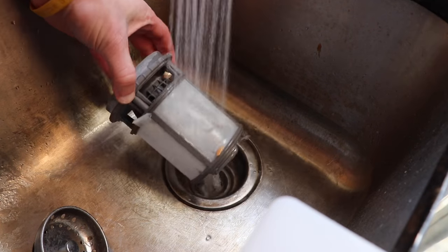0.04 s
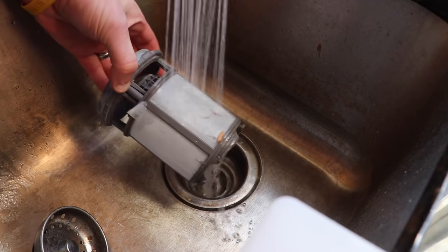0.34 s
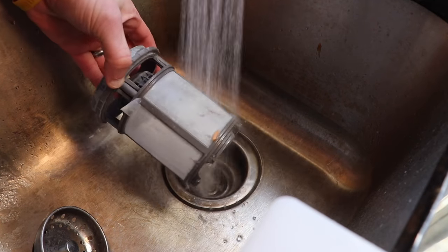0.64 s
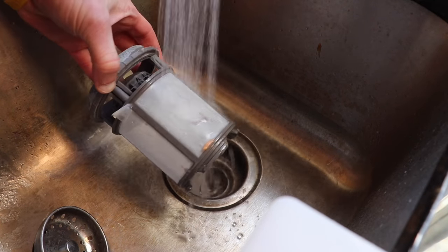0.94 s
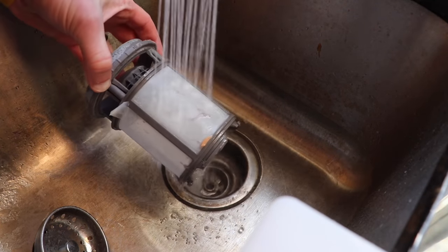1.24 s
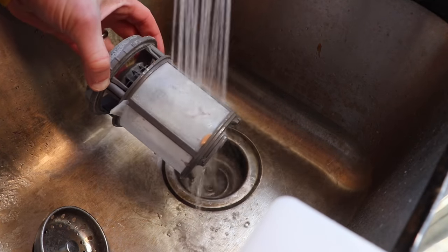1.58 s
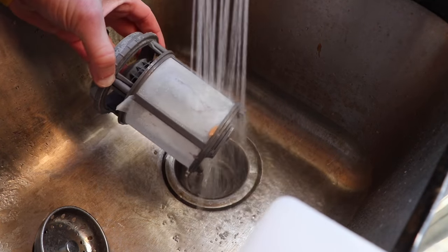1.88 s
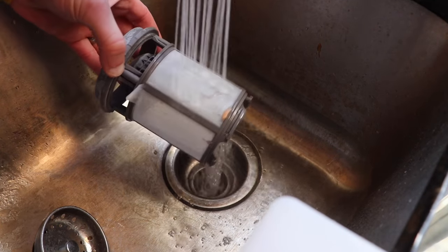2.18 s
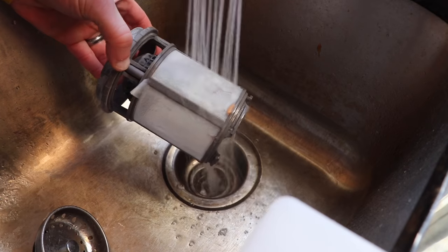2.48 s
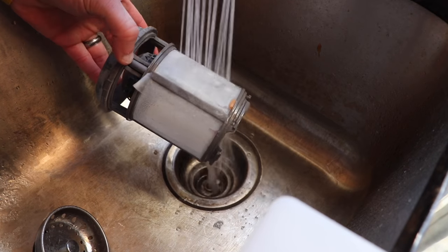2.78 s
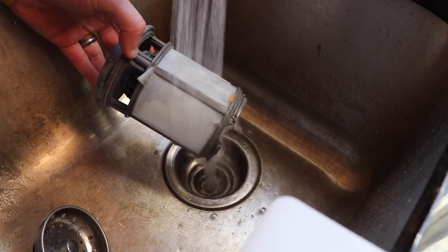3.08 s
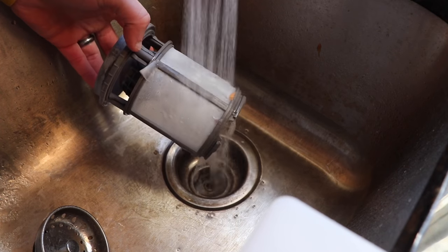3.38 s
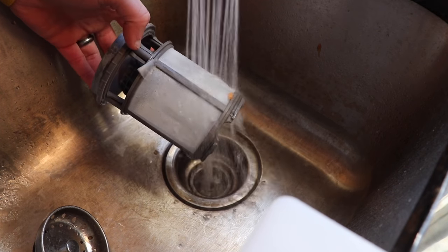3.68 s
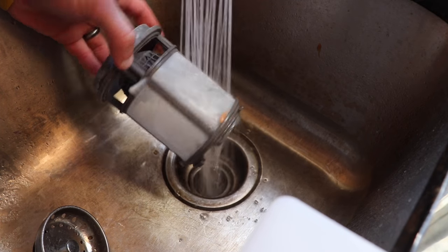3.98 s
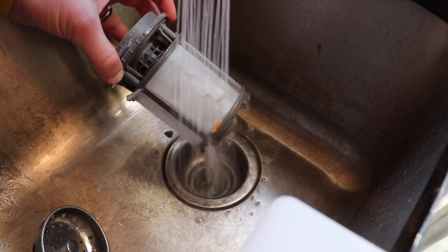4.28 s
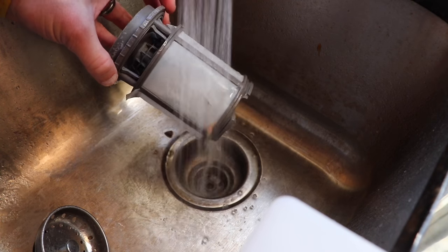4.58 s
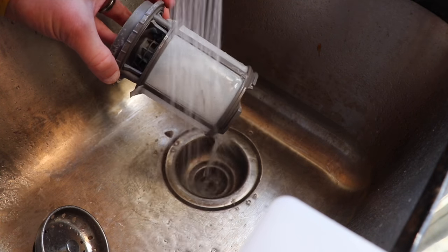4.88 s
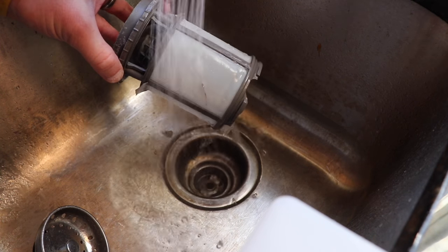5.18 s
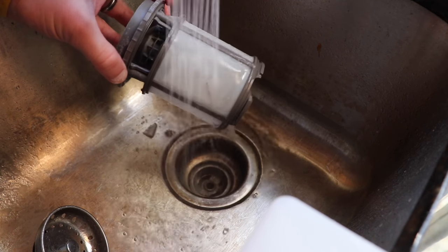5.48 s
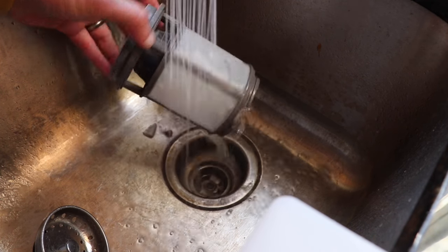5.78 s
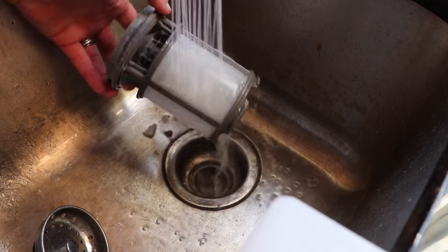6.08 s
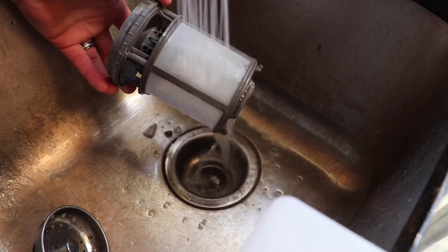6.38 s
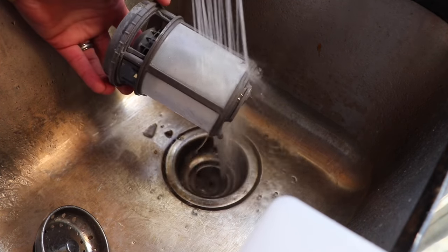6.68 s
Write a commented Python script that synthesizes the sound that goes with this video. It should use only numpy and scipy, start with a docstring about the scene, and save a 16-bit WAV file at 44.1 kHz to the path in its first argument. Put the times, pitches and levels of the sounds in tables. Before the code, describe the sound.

A close, continuous rush of water from a sprayer hits a mesh filter and a steel sink. The splash has a metallic ring that slowly changes colour, topped by a bright hiss and faint high ringing from the wet filter. Hollow drumming and a few soft thuds of runoff lie beneath. Later come sharp little drop ticks, a single bubble pop and a light ring from the drain, with the water still running.

```python
"""You hear a steady, ringing rush of water: a tap sprayer playing on a mesh filter over a steel sink.
Countless drops set the basin ringing, and its tone shifts as the filter moves the landing spot.
Fine spray hisses on the mesh, and the wet filter rings as the jet sweeps over it. Runoff drums on the
steel floor, stray drops tick, one bubble pops, and near the end the open drain rings.
A faint low rumble lies under the opening moments."""
import sys
import numpy as np
from scipy import signal
from scipy.fft import rfft, irfft, next_fast_len
from scipy.io import wavfile

SR = 44100
rng = np.random.default_rng(int(sys.argv[2]) if len(sys.argv) > 2 else 0)


def waveform_to_disk(signal):
    """Save audio, clipped to [-1, 1], as 16-bit WAV at the path in sys.argv[1]."""
    frames = np.transpose(np.atleast_2d(signal))
    scaled = np.clip(frames, -1, 1) * 32767
    samples = np.round(scaled).astype(np.int16)
    wavfile.write(sys.argv[1], SR, samples)


N = 297234
TIME = np.arange(N) / SR

# The basin's ringing notes. Each row: pitch in Hz, width in Hz, then strength in dB for each of the
# five landing spots, 0 to 4.
BASIN_NOTES = [(529, 56, -30, -30, -30, -17, -20), (609, 90, -17.5, -17.5, -21, -13, -16.5),
               (703, 87, -18, -17.5, -20, -18, -22), (769, 94, -16, -17, -17, -16, -16),
               (865, 90, -11, -13, -11.5, -16, -17), (930, 72, -9, -12, -9, -18, -20),
               (1069, 90, -12, -12.5, -13, -17, -24), (1121, 70, -15, -11.5, -9, -11, -7.5),
               (1204, 82, -30, -18.5, -13, -12.5, -9), (1310, 96, -9, -7, -18, -16, -28),
               (1422, 92, -8.5, -7.5, -13, -12, -11), (1487, 75, -14, -14, -18, -13, -14),
               (1588, 85, -9.5, -9.5, -11.5, -13, -14), (1649, 68, -14, -14, -16, -15, -23),
               (1782, 87, -12, -15, -18, -17, -17), (1872, 90, -17, -21, -16, -11, -17),
               (2016, 148, -14.5, -14, -13, -12.5, -14), (2167, 116, -16, -19, -13.5, -17, -13.5),
               (2372, 241, -20, -14.5, -16, -21, -25), (2731, 241, -18, -17, -19, -19, -17),
               (2947, 158, -19, -16, -14.5, -21, -20), (3048, 137, -16, -15, -14, -17, -14),
               (3229, 210, -16, -13, -15, -18, -19), (3469, 221, -20, -19, -20, -25, -22),
               (3759, 162, -26, -26, -20, -25, -23), (4089, 233, -22, -23, -17, -19, -18.5),
               (4578, 281, -26, -26, -21, -20, -16.5), (4754, 166, -24, -24, -20, -24, -24),
               (5428, 407, -22, -25, -23, -22.5, -21.5)]
# Where the water lands. Each row: time in seconds, spot number (outside 0 to 4, the nearest end counts).
LANDING_SPOT = [(0, -0.5), (0.45, 0.7), (1.3, 1), (1.7, 1), (1.9, 1.9), (2.3, 1.76), (2.8, 1.5), (3.15, 2),
                (3.6, 2), (4.15, 2), (4.4, 3), (4.7, 3.5), (5.3, 4), (6.1, 7), (6.74, 6)]
# Water that misses the filter and hits the steel directly. Each row: time in seconds, boost in dB.
DIRECT_JET = [(0, 1.5), (.65, -0.1), (1.1, -1.6), (1.65, -1.1), (1.9, -3), (2.1, 0), (2.75, -2),
              (3.25, 1.5), (3.5, -0.5), (3.65, -1.5), (4.05, 2.5), (4.35, 0), (5.4, 0.3), (5.8, 0.4),
              (6.74, -2.1)]
# Fine spray, louder when the jet meets the mesh squarely. Each row: time in seconds, level in dB.
SPRAY_LEVEL = [(0, -53.5), (0.4, -54.5), (0.98, -52.5), (1.22, -55), (1.7, -51.5), (2.02, -52),
               (2.15, -53.5), (2.47, -51), (2.65, -52.5), (3.0, -51.5), (3.65, -52.5), (3.9, -53),
               (4.3, -51), (4.65, -50.8), (5.0, -51), (5.27, -50), (5.9, -51), (6.2, -54), (6.74, -50)]
# Echoes off the basin walls. Each row: delay in seconds, strength in dB.
WALL_ECHOES = [(.0028, -22), (.0044, -18), (.00555, -17), (.0064, -21), (.008, -21)]
# The jet sweeping over the filter. Each row: middle in seconds, length in seconds, pitch at the middle
# in Hz, glide in Hz per second, width in Hz, level in dB.
FILTER_SWEEPS = [(0.932, 0.85, 3080, 4, 460, -53), (1.4, 0.43, 3190, 0, 460, -50.5),
                 (1.82, 1.2, 3630, 1100, 360, -53), (2.301, 1.5, 3234, -200, 460, -51),
                 (2.457, 2.2, 4280, 298, 700, -54), (3.792, 0.27, 3750, 7, 300, -52.5),
                 (5.198, 0.44, 4100, -2, 240, -54.5), (5.8, 0.81, 4090, 0, 200, -52),
                 (6.26, 0.32, 3190, 3, 400, -51), (6.66, 0.93, 3144, 3, 400, -47.5)]
# Water pouring off the filter. Each row: time in seconds, drumming level in dB.
RUNOFF_LEVEL = [(0, -61), (0.7, -67), (1.0, -62.5), (1.25, -68), (2.2, -64), (3.05, -62.5), (3.3, -63.5),
                (3.85, -60.5), (4.25, -60), (4.55, -56), (5.1, -60.5), (5.6, -60.5), (6.2, -65.5),
                (6.74, -60.5)]
# Heavy blobs of runoff landing. Each row: time in seconds, base level in dB, pitch in Hz.
BLOBS = [(2.45, -54, 250), (2.976, -55, 285), (3.001, -55, 120), (3.068, -54, 148), (3.614, -50, 370),
         (3.639, -52, 277), (3.79, -51, 130), (3.885, -56, 170), (4.038, -52, 116), (4.468, -53, 161),
         (4.738, -54, 186), (4.864, -55, 236), (5.544, -53.5, 250), (5.826, -50, 145), (5.85, -53, 157)]
# Short showers of droplets. Each row: middle in seconds, length in seconds, level in dB.
SPATTERS = [(3.0, .2, -62), (3.61, 0.33, -56), (4.718, .7, -59), (5.33, .6, -58)]
# Single sharp drops. Each row: start in seconds, level in dB, pitch in Hz.
STRAY_DROPS = [(1.5259, -41, 7660), (3.5803, -35.5, 8450), (3.6795, -36, 7850), (4.5585, -36, 7400),
               (4.8933, -37.5, 8300), (5.2324, -36, 7900), (5.2729, -34, 7390), (5.2919, -34, 8620),
               (5.4086, -36, 8100), (5.466, -39, 7990), (5.5014, -31.5, 8060), (6.4832, -35.5, 7030),
               (6.5869, -40, 7380)]
# A bursting bubble. Each row: start in seconds, level in dB, pitch in Hz, seconds to fade by 60 dB.
BUBBLES = [(4.8257, -22.5, 4400, .008)]
# The drain cup's ring. In order: middle in seconds, length in seconds, pitch in Hz, width in Hz,
# level in dB.
DRAIN_RING = (6.5, 1.8, 1195, 140, -47)

# Tone colours: how a sound is spread from low to high. Each row: frequency in Hz, relative level in dB.
WASH_COLOUR = [(200, -19.5), (420, -5), (560, -4.5), (1000, -1.5), (1700, -3.5), (2500, -5), (3600, -0.5),
               (4900, -4), (6000, -12.5), (7500, -33)]  # the broad body of the splash
SPRAY_COLOUR = [(4500, -29.5), (6000, -10.5), (6700, 0), (7200, 2), (7900, 3.5), (8600, 0.5), (9500, -0.5),
                (10700, -5.5), (12500, -18), (15500, -46)]  # bright hiss
MIST_COLOUR = [(7000, -14), (10000, -4.5), (12000, -3.5), (13500, -6), (15600, -12)]  # the very highest hiss
DRUM_COLOUR = [(20, -41), (38, -26), (55, -20), (80, -6), (120, 1.5), (160, 1), (200, -1), (260, 1.5),
               (330, -3.5), (450, -0.5), (540, -2), (700, -11), (1200, -53)]  # hollow drumming on steel
TICK_COLOUR = [(2000, -18), (4000, -14), (6000, -2), (8500, 6), (12000, -1), (15500, -19)]  # the spit of one drop
RUMBLE_COLOUR = [(12, -6), (28, -6), (55, -4), (100, -13), (250, -35)]  # deep bass


def basin(spray_change_db, low_db=-40, high_db=-40.5):
    """Drops set the steel basin's notes ringing; how strongly depends on where they land."""
    spot = curve(LANDING_SPOT)
    direct_db = curve(DIRECT_JET)
    out = np.zeros(N)
    for hz, width_hz, *spot_db in BASIN_NOTES:
        strength = np.interp(spot, np.arange(len(spot_db)), from_db(spot_db))
        if hz < 2500:  # the lower the note, the more it follows the direct jet
            drive_db = low_db + direct_db * (790 / hz) ** 2.4
        else:  # high notes follow the lighter spray
            drive_db = high_db + 0.22 * spray_change_db
        ringing = rms_one(resonate(drops(per_s=1500, spread_db=2.5), hz, width_hz))
        out += ringing * strength * from_db(drive_db + 0.78 * drift(rate_hz=7.5))
    return out


def splash(spray_db, spray_change_db):
    """Water breaks up on mesh and steel in tiny spurts, making a broad wash, a hiss and a fine mist."""
    wash_db = -47.5 + 0.13 * spray_change_db + 0.11 * curve(DIRECT_JET)
    mist_db = -59.5 + 1.15 * spray_change_db
    spurts = from_db(0.84 * drift(rate_hz=12.3) + 0.28 * drift(rate_hz=33))
    shared_hits = drops(per_s=8000, spread_db=3.0) * spurts  # heard in both wash and spray
    wash_hits = shared_hits + 0.38 * drops(per_s=5000, spread_db=2.0)
    spray_hits = shared_hits + 0.93 * drops(per_s=11000, spread_db=0.0) * spurts
    mist_hits = drops(per_s=14000, spread_db=5.0) * spurts
    wash = wall_echoes(colour(wash_hits, WASH_COLOUR)) * from_db(wash_db)
    spray = wall_echoes(colour(spray_hits, SPRAY_COLOUR)) * from_db(spray_db - 0.82)
    mist = wall_echoes(colour(mist_hits, MIST_COLOUR)) * from_db(mist_db)
    return wash + spray + mist


def filter_ring():
    """The wet filter rings with each sweep of the jet, its pitch gliding as the jet moves along it."""
    out = np.zeros(N)
    for middle_s, length_s, hz, glide_hz_per_s, width_hz, db in FILTER_SWEEPS:
        smoothing = signal.butter(2, width_hz / 2, fs=SR, output="sos")
        shiver = signal.sosfilt(smoothing, drops(per_s=4300, spread_db=3.5))
        cycles = hz * TIME + glide_hz_per_s * (TIME - middle_s) ** 2 / 2
        phase = 2 * np.pi * cycles + drift(rate_hz=93)  # the film of water unsettles the pitch
        out += from_db(db) * swell(middle_s, length_s) * rms_one(shiver * np.sin(phase))
    return out


def spatters():
    """The jet catches a rib or the rim of the filter and throws off a shower of sharp droplets."""
    showers = sum(from_db(db) * swell(middle_s, length_s) for middle_s, length_s, db in SPATTERS)
    return showers * wall_echoes(colour(drops(per_s=900, spread_db=2.5), MIST_COLOUR))


def drain():
    """The filter is lifted off the drain, and drops falling in set the open cup ringing."""
    middle_s, length_s, hz, width_hz, db = DRAIN_RING
    ringing = rms_one(resonate(drops(per_s=1500, spread_db=3.5), hz, width_hz))
    return from_db(db) * swell(middle_s, length_s) * ringing


def runoff():
    """Thick strands of water drum on the basin floor; now and then a heavy blob thuds and splats."""
    drumming = rms_one(colour(drops(per_s=700, spread_db=2.5), DRUM_COLOUR))
    splats = sum(from_db(db - 11) * swell(time_s, length_s=0.047) for time_s, db, _ in BLOBS)
    # Each thud starts one cycle early, so it peaks together with its splat.
    thuds = sum(ping(time_s - 1 / hz, db + 9.5, hz, fade_s=0.057) for time_s, db, hz in BLOBS)
    return drumming * (from_db(curve(RUNOFF_LEVEL)) + splats) + thuds


def stray_drops(decay_s=0.002):
    """Stray drops hit bare steel with a short bright spit and a tiny ring, each at its own pitch."""
    hiss = rms_one(colour(rng.standard_normal(N), TICK_COLOUR))
    out = np.zeros(N)
    for start_s, db, hz in STRAY_DROPS:
        fade = np.exp(-np.clip((TIME - start_s) / decay_s, 0, 20))
        spit = from_db(db - 4) * (TIME >= start_s) * fade * hiss
        out += spit + ping(start_s, db, hz, fade_s=0.0075)
    return out


def bubble():
    """A small bubble bursts with a short, high ping."""
    return sum(ping(*row) for row in BUBBLES)


def rumble(db=-73, end_s=1.45, fade_s=0.1):
    """A faint low rumble holds steady, then quickly fades out."""
    hold = np.clip((end_s - TIME) / fade_s, 0, 1)
    return from_db(db) * hold * rms_one(colour(rng.standard_normal(N), RUMBLE_COLOUR))


def wall_echoes(sound):
    """The steel walls add faint echoes a few milliseconds later; the result has average level 1."""
    echoes = sum(from_db(db) * np.roll(sound, round(delay_s * SR)) for delay_s, db in WALL_ECHOES)
    return rms_one(sound - echoes)


def drops(per_s, spread_db):
    """Clicks at random moments, with average level 1; more spread makes a few stand out."""
    sizes = from_db(spread_db * np.minimum(rng.exponential(1, N), 4))
    hits = rng.random(N) < per_s / SR
    return rms_one(hits * sizes * rng.choice([-1, 1], N))


def resonate(sound, hz, width_hz):
    """Make a sound ring around one pitch by passing it three times through a peak filter."""
    b, a = signal.iirpeak(hz, hz / (1.14 * width_hz), fs=SR)  # each pass narrows the peak further
    run_in = sound[-SR // 20:]  # so it is already ringing at the start
    three_passes = np.array([[*b, *a]] * 3)
    return signal.sosfilt(three_passes, np.concatenate([run_in, sound]))[-N:]


def ping(start_s, db, hz, fade_s):
    """A pure tone that rises within one cycle and dies away by 60 dB in fade_s seconds."""
    age = np.maximum(TIME - start_s, 0)
    rise = np.minimum(age * hz, 1)
    fall = from_db(db - 60 * np.minimum(age / fade_s, 4))
    return rise * fall * np.sin(2 * np.pi * hz * age)


def colour(sound, spectrum):
    """Give a sound the tone colour in a table (a minimum-phase filter)."""
    size = 2 * next_fast_len(N // 2 + SR // 4)
    hz, db = np.transpose(spectrum)
    grid_hz = np.maximum(np.arange(size // 2 + 1) * SR / size, 1)
    gains = from_db(np.interp(np.log(grid_hz), np.log(hz), db))
    cepstrum = irfft(np.log(gains))
    # Folding the second half onto the first makes the filter ring after each hit, never before it.
    cepstrum[1:size // 2] *= 2
    cepstrum[size // 2 + 1:] = 0
    return irfft(rfft(sound, size) * np.exp(rfft(cepstrum)))[:N]


def drift(rate_hz):
    """A smooth random wobble of typical size 1; a higher rate makes it wobble faster."""
    step, run_in = 40, 2000  # samples per random value; values skipped while the smoothing settles
    memory = np.exp(-2 * np.pi * step * rate_hz / SR)
    noise = rng.standard_normal(N // step + run_in + 2)
    slow = signal.lfilter([1], [1, -2 * memory, memory * memory], noise)[run_in:]
    return np.interp(np.arange(N) / step, np.arange(len(slow)), rms_one(slow))


def swell(middle_s, length_s):
    """A smooth rise from 0 to 1 and back."""
    return np.cos(np.pi * np.clip((TIME - middle_s) / length_s, -.5, .5)) ** 2


def curve(rows):
    """Join a table's points with straight lines, giving one value per sample."""
    times_s, values = np.transpose(rows)
    return np.interp(TIME, times_s, values)


def from_db(db):
    """Turn decibels into a number to multiply by."""
    return 10 ** (np.asarray(db) / 20)


def rms_one(sound):
    """Scale a sound so its average level (root mean square) is 1."""
    return sound / np.sqrt(np.mean(sound ** 2) + 1e-20)


def scene():
    """Mix the jet on basin and filter with the smaller sounds, in one channel."""
    spray_db = curve(SPRAY_LEVEL)
    spray_change_db = spray_db - spray_db.mean()
    surge = from_db(0.5 * drift(rate_hz=6.1))  # the whole jet wavers a little
    jet = basin(spray_change_db) + filter_ring() + splash(spray_db, spray_change_db)
    water = surge * (jet + spatters() + drain())
    return (water + runoff() + stray_drops() + bubble() + rumble())[None]


def record(dry):
    """Cut the treble steeply above 15700 Hz."""
    return signal.sosfilt(signal.ellip(12, .1, 80, 15700, fs=SR, output="sos"), dry)


dry = scene()
out = record(dry)
waveform_to_disk(out)
```